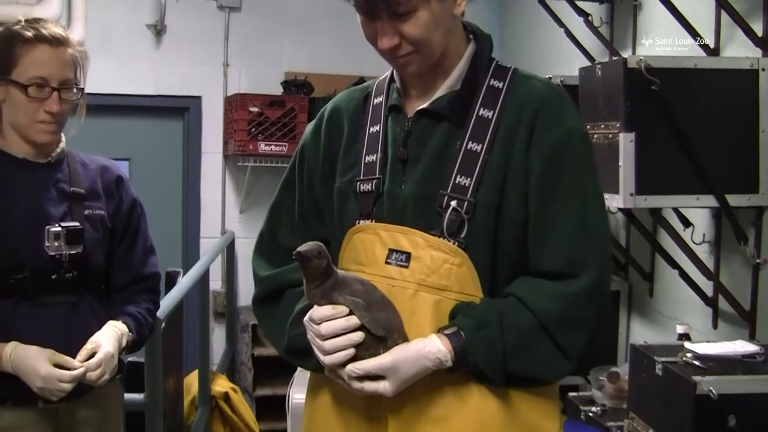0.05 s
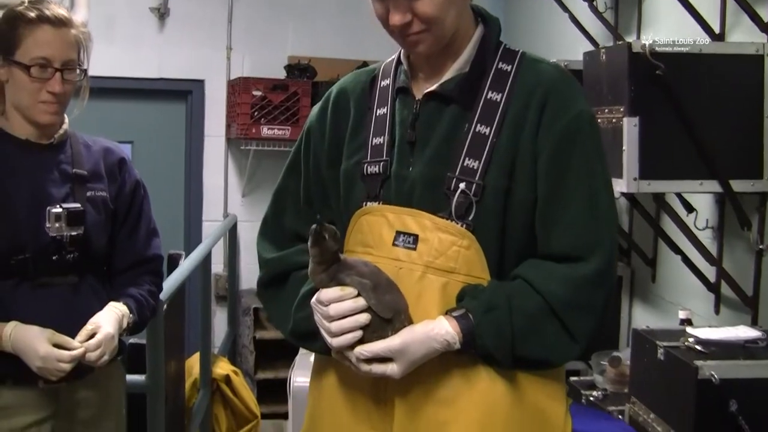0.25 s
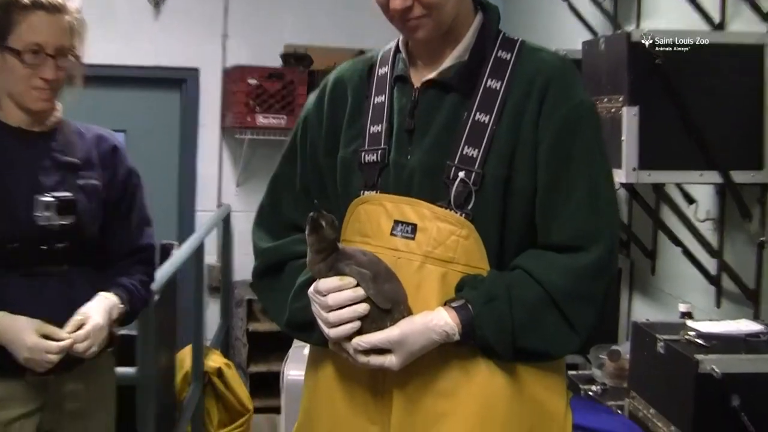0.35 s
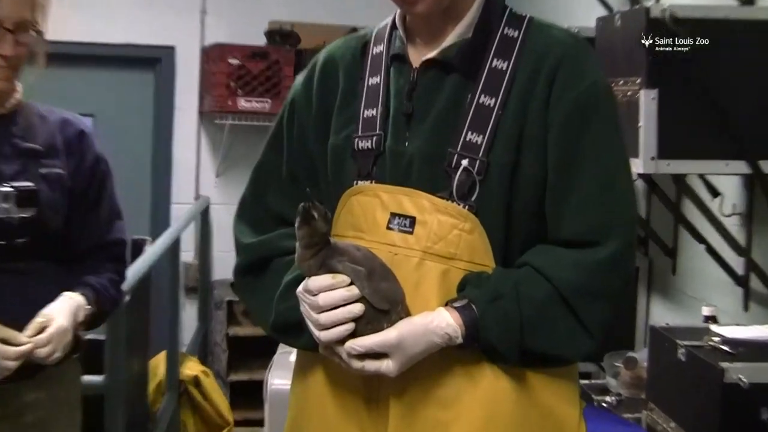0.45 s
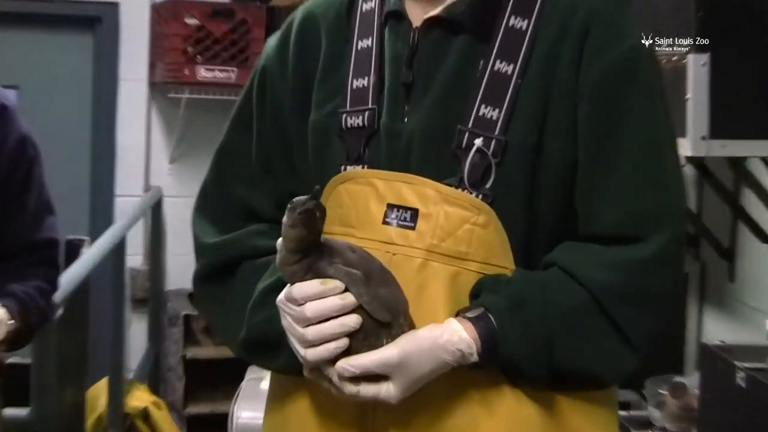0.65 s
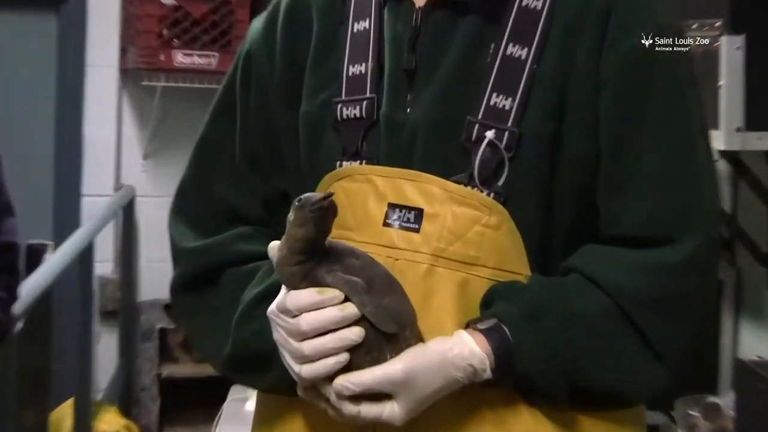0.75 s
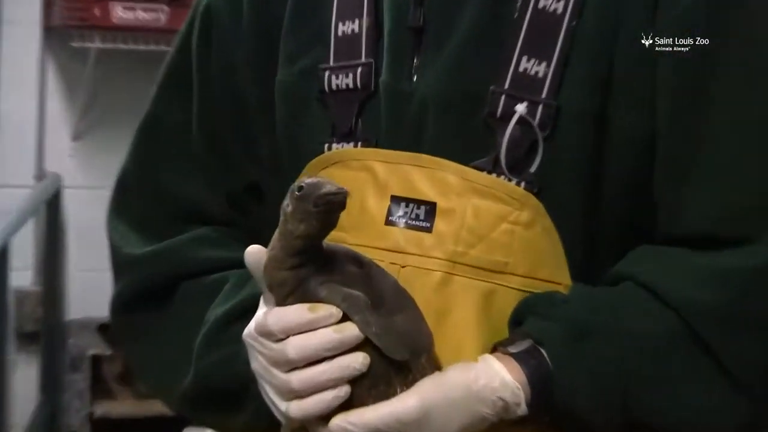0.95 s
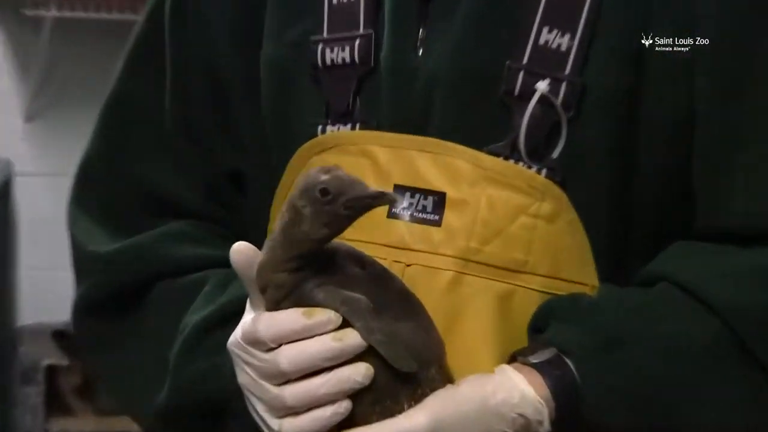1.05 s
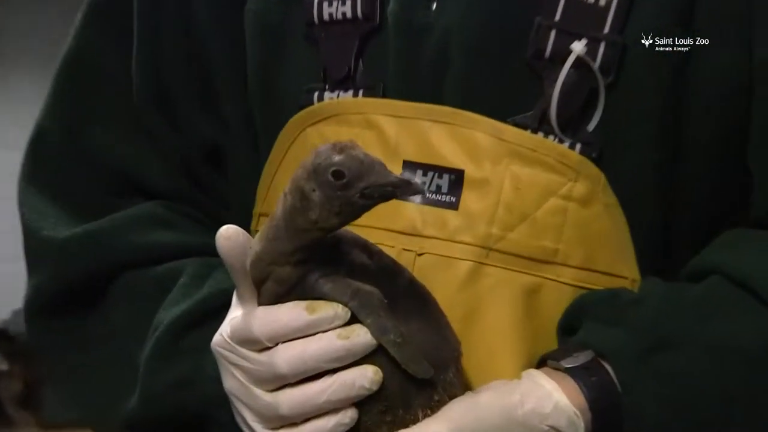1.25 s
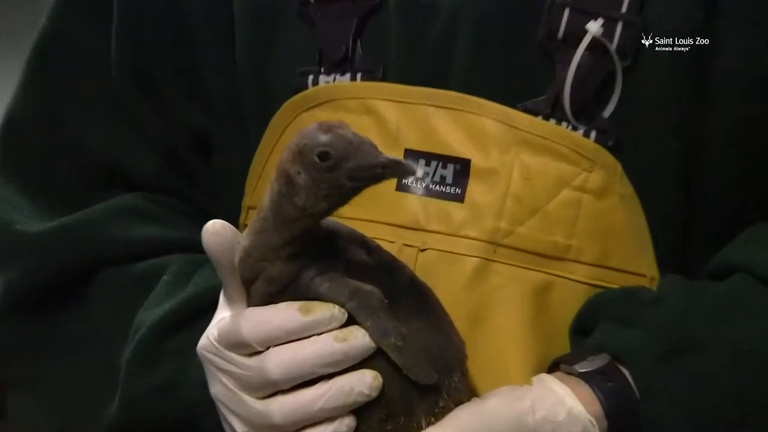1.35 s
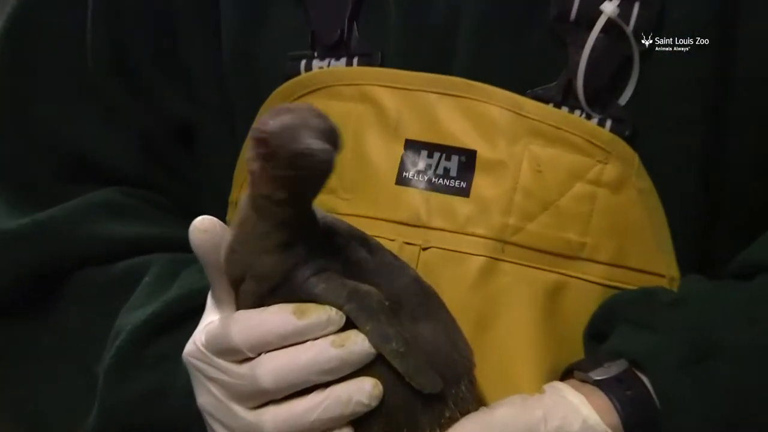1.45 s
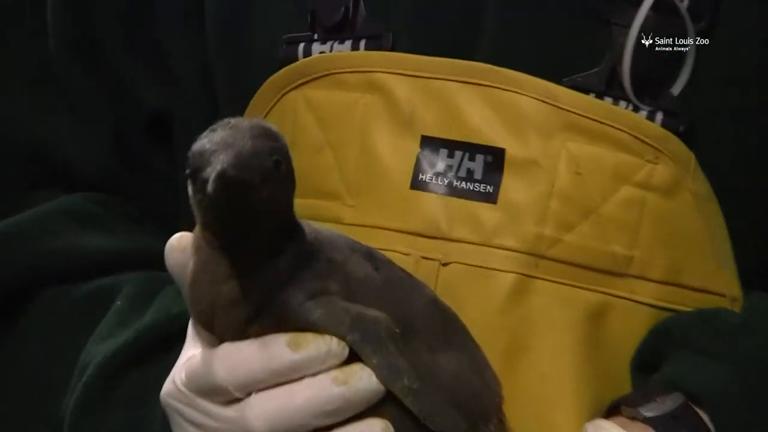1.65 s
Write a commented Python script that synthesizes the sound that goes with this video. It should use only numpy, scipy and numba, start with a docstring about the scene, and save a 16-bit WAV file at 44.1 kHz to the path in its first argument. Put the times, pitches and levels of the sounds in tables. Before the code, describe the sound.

A bird chick gives one loud, piercing whistle that rises, dips and sags in a humming room

```python
"""Ventilation rumbles from the start in a hard-walled room with a bird chick a few metres from a stereo microphone.
At 0.2 s the chick gives one loud whistle, a near sine at first, gliding up to 3.5 kHz.
It dips near 0.47 s, springs back, then sags through 2.3 kHz with breath and a strong second harmonic, ending by 0.73 s.
Dense reflections smear each glide into a tail.
Gain control pulls everything down while the chick calls, and the ventilation comes back up afterwards."""
import sys
import numpy as np
from scipy import signal
from scipy.fft import rfft, irfft
from scipy.io import wavfile
from scipy.ndimage import uniform_filter1d, minimum_filter1d
from numba import njit

SR = 44100
rng = np.random.default_rng(int(sys.argv[2]) if len(sys.argv) > 2 else 0)


def put_to_file(sound):
    """Save the sound as 16-bit audio at rate SR, in the file named by the first command-line argument."""
    columns = np.atleast_2d(sound).T  # one column per channel
    safe = np.clip(columns, -1, 1)
    whole_steps = np.round(safe * 32767)
    wavfile.write(sys.argv[1], SR, whole_steps.astype(np.int16))


def linear_from_db(decibels):
    """Turn decibels (scalar or array-like) into linear amplitude factors; 0 gives 1."""
    return 10 ** (np.asarray(decibels, float) / 20)


N = 74970  # samples, 1.7 s

# Spectrum shape of the ventilation air: pitch_hz, density_db (dB per Hz, relative)
AIR_SPECTRUM = [(20, 4.5), (38, -10.5), (59, -3.5), (122, -1), (239, -0.5), (394, -9.5), (1270, -17.5),
                (2100, -22), (2800, -21.5), (4450, -27), (8690, -31), (13000, -37), (16000, -45)]
# Correlation of the air between the two microphones, ahead of the lag: pitch_hz, likeness (0 to 1)
AIR_LIKENESS = [(60, 1), (130, 0.87), (290, 1), (640, 0.0044), (1410, 1), (3100, 0.071), (6820, 0.057),
                (15000, 0.085)]
# Wavering fan tones: pitch_hz, width_hz (between half-amplitude points), level_db (rms, ahead of pan and gain control)
FAN_TONES = [(121.4, 24, -39), (185.8, 4.7, -44), (256.2, 36, -43), (36, 23, -45.5)]
# Course of the whistle: start_s, pitch_hz, level_db (ahead of room, pan and gain control),
# then relative to the whistle: second_harmonic_db, higher_harmonics_db, breath_db
CALL = [(0.2175, 3150, -6.5, -31, -34, -9), (.221, 3160, -8, -15, -36, -11),
        (0.241, 3164, 5, -25, -56, -27.5), (.268, 2998, 6.5, -18, -17, -20.5),
        (0.299, 3287, 10, -27, -36, -58), (0.352, 3540, 3, -12.5, -22, -41),
        (0.383, 3487, 0.5, -27, -30, -12), (0.418, 3393, -11.5, -21, -38, -0.5),
        (0.435, 3140, -17, -10, -38, -1.5), (.45, 2682, -9.5, -28, -32, 1.5),
        (0.467, 2385, -8, -15, -34, -10.5), (0.486, 2516, -14, -5, -19, -2),
        (.50, 2779, -5.5, -13, -11.5, -14.5), (.525, 2823, -2, -30, -17, -11.5),
        (0.552, 2396, -10.5, -3.5, -28, -8), (0.573, 2307, -14, 0.5, -9, -10),
        (0.613, 2315, -8.5, -3.5, -9, -19), (0.651, 2293, -7.5, -12.5, -13, -13),
        (.675, 2095, -12.5, -4, -13, -15.5), (0.701, 1990, -17, -14, -20, -18),
        (.715, 2020, -44, 13, -24, -33), (.73, 1900, -58, -12, -6, -30)]
# Spectrum shape of the chick's breath: pitch_hz, density_db (dB per Hz, relative)
BREATH_SPECTRUM = [(1500, -29.5), (2300, -8), (3500, 2.5), (4800, -5.5), (6000, -5), (8000, -4),
                   (10500, -4.5), (13000, -10.5), (16000, -19)]

AIR_DB = -30  # rms, ahead of pan and gain control
AIR_PAN_DB, AIR_LAG_S = -4, .0001  # left minus right; delay of the left
BASS_DRIFT_DB, FLICKER_DB = 0.1, 0.87  # slight shared bass variation; each octave alone
ROOM_DB, ROOM_T60_S, TREBLE_T60_S, ROOM_GAP_S = -1.36, 0.43, 0.31, 0.0023
JITTER, RASP, JITTER_HZ = .002, .03, 300  # pitch wobble as a fraction; more of it with breath; rate
HARMONIC_FALL_DB = -5  # per harmonic above the 3rd
HALF_S, HALF_LENGTH_S, HALF_DB = .635, 0.017, -12  # period doubling: time, spread, level relative to the whistle
FLUTTER_DB, FLUTTER_HZ = 6, 120  # unsteady tone, scaled by breath amplitude
GRAIN_DB, GRAIN_HZ = 2, 200  # grainy breath
ONSET_S, ONSET_RISE_S = .2153, .003
CHICK_PAN_DB, CHICK_TREBLE_PAN_DB, CHICK_LAG_S = -1.5, -4.5, -.00003  # left minus right; extra above 7 kHz
THRESHOLD_DB, RATIO, SENSE_S, ATTACK_S, RELEASE_S = -18, 3.91, .008, 0.0029, 0.027
HOLD_DB, HOLD_S, HOLD_FADE_S = 10, 0.18, 0.087  # largest excess that is held after loud sound
TOP_HZ = 15750


def level(x, db):
    """Scale to an rms level."""
    return x * linear_from_db(db) / np.sqrt(np.mean(x ** 2))


def across(table, hz):
    """Read a (pitch_hz, value) table on a log-frequency axis."""
    table = np.array(table, float)
    return np.interp(np.log(np.maximum(hz, 1)), np.log(np.maximum(table[:, 0], 1)), table[:, 1])


def walk(rate):
    """Random levels held 1 / rate s and smoothed twice; spread near 1."""
    k = int(SR / rate)
    steps = np.repeat(rng.standard_normal(N // 50)[:N // k + 1], k)
    return 1.3 * uniform_filter1d(uniform_filter1d(steps, k), k)[:N]


def place(left, right, pan_db, lag_s, treble_db=0):
    """Set a source before two microphones by level and arrival-time difference."""
    hz = np.fft.rfftfreq(N, 1 / SR)
    treble = 1 / (1 + (7000 / (hz + 1)) ** 4)
    half = linear_from_db((pan_db + treble_db * treble) / 2)
    delay = np.exp(-2j * np.pi * hz * lag_s)
    return np.array([irfft(rfft(left) * delay * half, N), irfft(rfft(right) / half, N)])


@njit
def slew(db, attack, release):
    """Follow a level quickly upwards and slowly downwards."""
    out, e = np.empty(len(db)), 0.
    for i in range(len(db)):
        e += (db[i] - e) * (attack if db[i] > e else release)
        out[i] = e
    return out


def ventilation():
    """Steady air noise whose octaves each flicker slightly alone; fan tones waver in the bass."""
    hz = np.fft.rfftfreq(N, 1 / SR)
    mid, side = rfft(rng.standard_normal((2, N))) * linear_from_db(across(AIR_SPECTRUM, hz))
    likeness = np.clip(across(AIR_LIKENESS, hz), -.99, .99)
    apart = np.sqrt((1 - likeness) / (1 + likeness))
    pair = np.array([mid + side * apart, mid - side * apart])
    out, drift = 0, walk(11.6)
    for k in range(11):
        # overlapping bands centred on 20 Hz and each octave above
        octave = np.log2(np.maximum(hz, 1) / 20) - k
        share = np.cos(np.pi / 2 * np.clip(octave, -1, 1)) ** 2
        bass = np.clip(1.5 - k / 5, 0, 1)
        out = out + irfft(pair * share, N) * linear_from_db(BASS_DRIFT_DB * drift * bass + FLICKER_DB * walk(20))
    out = level(out, AIR_DB)
    for tone_hz, width, db in FAN_TONES:
        resonance = 1 + ((hz - tone_hz) / width * 2) ** 2
        out = out + level(irfft(rfft(rng.standard_normal(N)) / resonance, N), db)
    return place(out[0], out[1], AIR_PAN_DB, AIR_LAG_S)


def room(x):
    """Dense reflections, different at each microphone, the treble dying first."""
    t = np.arange(SR) / SR
    noise = rng.standard_normal((2, SR))
    low = signal.sosfilt(signal.butter(3, 7000, fs=SR, output="sos"), noise)
    tail = low * linear_from_db(-60 * t / ROOM_T60_S) + (noise - low) * linear_from_db(-60 * t / TREBLE_T60_S)
    # silent for one gap, then rising over another
    tail = tail * np.clip(t / ROOM_GAP_S - 1, 0, 1)
    tail = tail / np.sqrt(np.sum(tail ** 2, axis=1, keepdims=True))
    return linear_from_db(ROOM_DB) * signal.fftconvolve(x[None], tail, axes=1)[:, :N]


def chick():
    """Six harmonics on the gliding pitch, a brief line at 1.5 times the pitch, and breath noise."""
    t, call = np.arange(N) / SR, np.array(CALL, float)
    curves = [uniform_filter1d(np.interp(t, call[:, 0], column), size=90) for column in call.T[1:]]
    hz, db, second, higher, breath = curves
    wobble = (JITTER + RASP * linear_from_db(breath)) * walk(JITTER_HZ)
    phase = 2 * np.pi * np.cumsum(hz * (1 + wobble)) / SR
    tone = np.sin(phase) + linear_from_db(second) * np.sin(2 * phase)
    for k in range(3, 7):
        below_limit = k * hz < .45 * SR
        tone = tone + linear_from_db(higher + HARMONIC_FALL_DB * (k - 3)) * np.sin(k * phase) * below_limit
    doubling = np.exp(-((t - HALF_S) / HALF_LENGTH_S) ** 2)
    tone = tone + linear_from_db(HALF_DB) * doubling * np.sin(3 * phase / 2)
    tone = tone * linear_from_db(FLUTTER_DB * linear_from_db(breath) * walk(FLUTTER_HZ))
    breath_shape = linear_from_db(across(BREATH_SPECTRUM, np.fft.rfftfreq(N, 1 / SR)))
    air = level(irfft(rfft(rng.standard_normal(N)) * breath_shape, N), 0)
    air = linear_from_db(breath + GRAIN_DB * walk(GRAIN_HZ)) * air
    on = np.clip((t - ONSET_S) / ONSET_RISE_S, 0, 1) * (t < call[-1, 0])
    return on * linear_from_db(db) * (np.sqrt(2) * tone + air)  # sqrt(2) gives a sine an rms of 1


def scene():
    """The ventilation, with the whistle and its reflections in front."""
    voice = chick()
    wet = room(voice)
    whistle = place(voice + wet[0], voice + wet[1], CHICK_PAN_DB, CHICK_LAG_S, CHICK_TREBLE_PAN_DB)
    return whistle + ventilation()


def band_limit(x):
    """A steep low-pass at the top of the band."""
    return signal.sosfilt(signal.butter(12, 15750, fs=SR, output="sos"), x)


def record(dry):
    """Gain control turns down what exceeds the threshold and holds part of that for a moment; the top is cut."""
    sense = 1 / (SENSE_S * SR)
    power = signal.lfilter([sense], [1, sense - 1], np.mean(dry ** 2, axis=0))
    over = np.maximum(10 * np.log10(power + 1e-12) - THRESHOLD_DB, 0)
    # highest excess of the last HOLD_S, limited to HOLD_DB
    hold = 2 * int(HOLD_S * SR / 2) + 1
    held = -minimum_filter1d(-np.minimum(over, HOLD_DB), hold, origin=hold // 2, mode="nearest")
    attack = 1 / (ATTACK_S * SR)
    quick = slew(over, attack, 1 / (RELEASE_S * SR))
    lingering = slew(held, attack, 1 / (HOLD_FADE_S * SR))
    gain = linear_from_db(-(1 - 1 / RATIO) * np.maximum(quick, lingering))
    top_cut = signal.ellip(14, .2, 90, TOP_HZ, fs=SR, output="sos")
    mix = signal.sosfilt(top_cut, dry * gain)
    return band_limit(mix)


dry = scene()
out = record(dry)
put_to_file(out)
```